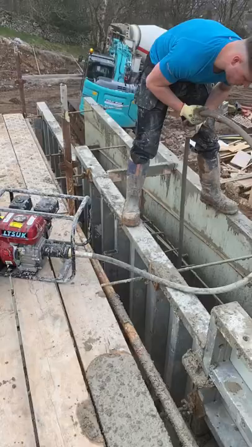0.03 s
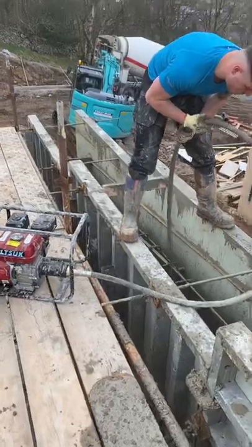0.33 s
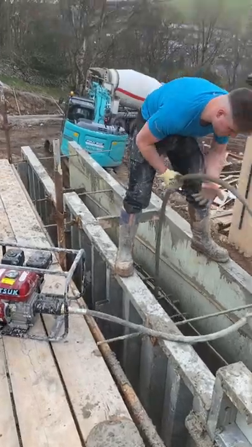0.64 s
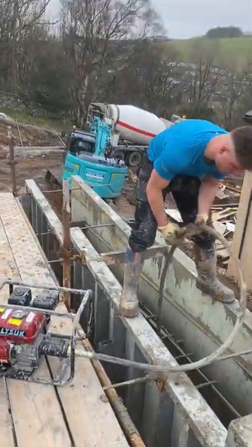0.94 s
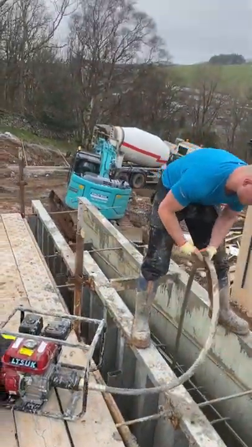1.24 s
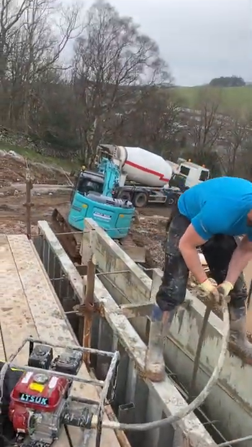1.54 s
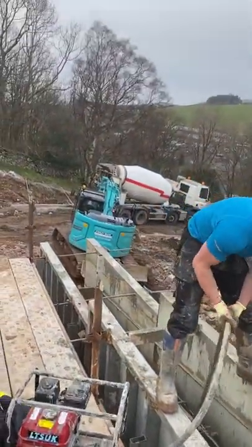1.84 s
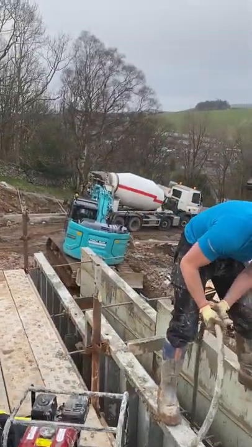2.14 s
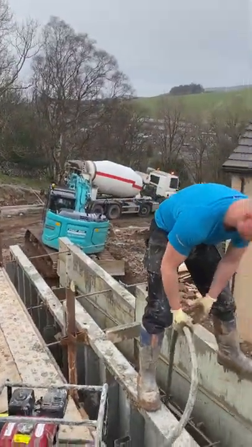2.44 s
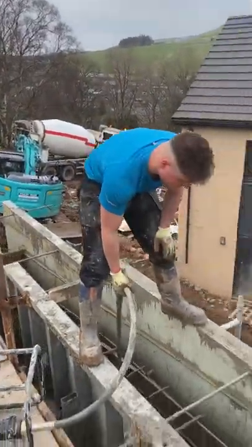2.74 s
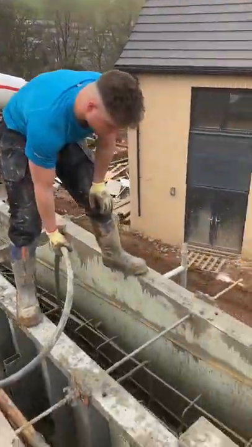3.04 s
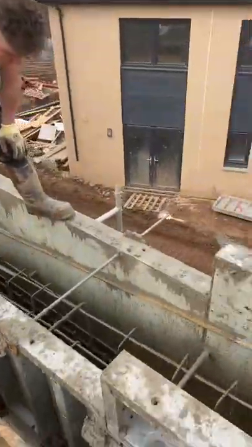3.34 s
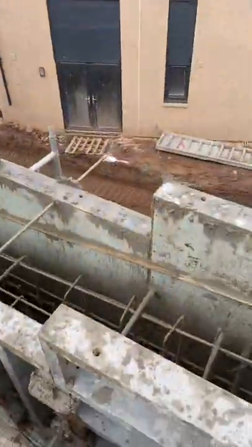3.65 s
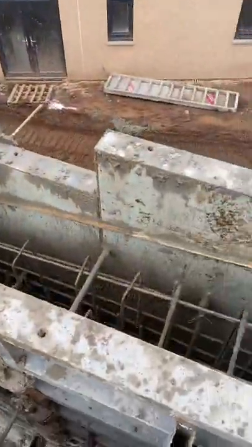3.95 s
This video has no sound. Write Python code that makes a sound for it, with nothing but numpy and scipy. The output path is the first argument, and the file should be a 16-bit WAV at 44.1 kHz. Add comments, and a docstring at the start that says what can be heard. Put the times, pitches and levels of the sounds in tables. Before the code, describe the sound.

Close petrol engine chugging steadily while a concrete vibrating poker drones and swells.

```python
"""On a building scaffold, a single-cylinder four-stroke petrol engine runs close by at governed speed.
Periodic puffs make its exhaust thud, impacts ring its casing, and its valve gear and fan clatter.
Through a flexible shaft it spins the eccentric weight of a vibrating poker, which drones and buzzes
against the concrete formwork as it is dipped and moved. The sound cuts out for an instant halfway."""
import sys
import numpy as np
from scipy import signal
from scipy.fft import rfft, irfft
from scipy.io import wavfile

SR = 44100
rng = np.random.default_rng(int(sys.argv[2]) if len(sys.argv) > 2 else 0)


def waveform_to_disk(signal):
    """Save audio, clipped to [-1, 1], as 16-bit WAV at the path in sys.argv[1]."""
    frames = np.transpose(np.atleast_2d(signal))
    scaled = np.clip(frames, -1, 1) * 32767
    samples = np.round(scaled).astype(np.int16)
    wavfile.write(sys.argv[1], SR, samples)


N = 176400
T = np.arange(N) / SR
HZ = np.fft.rfftfreq(N, 1 / SR)
RUMBLE_HZ, TREBLE_HZ, AIR_HZ = 686, 2650, 6360  # crossovers of the clatter bands
# impacts in each engine cycle (place [cycles], relative level [dB])
IMPACTS = [(.02, 0.5), (0.459, -8.5), (0.652, 0.5)]


def exhaust(cycles):
    """Harmonic series: one slightly uneven puff per firing, smeared by dispersion in the silencer."""
    # exhaust harmonics (order [multiple of firing rate], relative level [dB])
    harmonics = [(1, -51), (2, -37), (3, -41.5), (4, -32.5), (5, -27.5), (6, -28.5), (7, -39), (8, -34.5),
                 (9, -37.5), (12, -50), (13, -58.5), (14, -49.5), (16, -42), (18, -49)]
    # bass as the microphone moves round the exhaust (time [s], order 2 gain [dB], order 4 gain [dB])
    bass = [(0.05, 11.5, 3), (.2, 10.5, -1), (.45, 5.5, 2), (.6, 5, -3), (1.05, 5.5, -1), (1.4, 5.5, -1),
            (2, 4, 0), (2.6, 2.5, 1.5), (3.2, 3, 5), (3.8, -1.5, 2), (4, -2, 0.5)]
    thud_db, hum_db = curves(bass)
    swell_db = {2: thud_db, 4: hum_db}
    puffs = np.zeros(N)
    for k, db in harmonics:
        turns = k * (cycles + 0.0905) - 0.02168 * k ** 2  # high orders lag
        puffs += amp(db + swell_db.get(round(k), 0)) * np.cos(2 * np.pi * turns)
    return np.sqrt(2) * amp(-0.66) * puffs * (1 + 0.027 * wander(rate_hz=8.5))


def poker(cycles):
    """Rotating unbalance: the weight drones at its spin rate; contact with the formwork adds harmonics."""
    # drive ratio, slipping under load (time [s], ratio [turns per firing])
    gearing = [(.5, 7.7), (.65, 7.66), (1.0, 7.67), (1.25, 7.715), (1.7, 7.71), (1.9, 7.73), (2.5, 7.72),
               (2.85, 7.67), (3.3, 7.71), (4, 7.7)]
    # fundamental (time [s], level [dB])
    drone_level = [(0, -36), (.57, -35), (.62, -23), (.66, -22), (.71, -16), (.79, -17), (.86, -23),
                   (.93, -20), (1.0, -19), (1.11, -14.3), (1.17, -18), (1.23, -11.8), (1.34, -10.2),
                   (1.52, -11.7), (1.73, -15), (1.785, -23), (1.85, -12), (1.95, -17), (2.02, -22),
                   (2.17, -20), (2.35, -27), (2.56, -20), (2.72, -26), (2.92, -31), (3.15, -21.5),
                   (3.42, -19), (3.52, -24), (3.62, -20), (3.77, -16.5), (3.93, -19.5), (4, -24)]
    # contact buzz (time [s], second harmonic [dB], third harmonic [dB])
    buzz_level = [(0, -46, -60), (.54, -43, -58), (.58, -31.5, -48), (.65, -28.5, -37), (.7, -21.5, -21.5),
                  (.78, -20, -25.5), (.84, -23, -28), (.9, -16, -24.5), (.98, -19, -27), (1.08, -34, -44),
                  (1.2, -31.5, -36), (1.31, -34.5, -28.5), (1.52, -37.5, -42), (1.63, -22, -46),
                  (1.76, -33, -48), (2.2, -37.5, -35.5), (2.6, -37, -37), (2.82, -32, -46),
                  (3.1, -29.5, -41), (3.6, -39, -44), (3.95, -28, -51)]
    # upper buzz (harmonic [multiple of spin rate], level re third harmonic [dB])
    overtones = [(4, -9), (5, -13), (6, -9), (7, -14.5), (8, -15.5)]
    (drone_db,), (second_db, third_db) = curves(drone_level), curves(buzz_level)
    lag_turns = 0.1667
    turns = np.cumsum(curves(gearing)[0] * np.gradient(cycles)) + 0.012 * wander(rate_hz=15)
    drone = amp(drone_db) * np.cos(2 * np.pi * (turns - lag_turns)) * (1 + 0.04 * wander(rate_hz=7.2))
    contact = turns + 0.022 * wander(rate_hz=24)
    buzz = np.zeros(N)
    for k, db in [(2, second_db), (3, third_db)] + [(k, third_db + db) for k, db in overtones]:
        roughness = 1 + 0.17 * np.sqrt(k) * wander(rate_hz=15)
        buzz += amp(db) * np.cos(2 * np.pi * (k * contact - lag_turns * k ** 2)) * roughness
    return np.sqrt(2) * (drone + buzz)


def knocks(cycles):
    """Impact excitation: piston and valves strike the casing each cycle, and its damped modes ring."""
    # casing modes (frequency [Hz], relative level [dB], T60 [s])
    modes = [(384.3, -7.5, 0.078), (780, -0.5, 0.15), (869, -12.5, 0.08), (1019.5, 2.5, 0.082),
             (1200, -9, 0.048), (1415, -21, 0.0067), (1680, -8, 0.034), (1940, -7, 0.051),
             (2300, -14, 0.0072)]
    blows, t = np.zeros(N), np.arange(SR // 10) / SR
    for place, db in IMPACTS:
        times = np.interp(np.arange(int(cycles[-1])) + place, cycles, T)
        jitter, scatter_db = rng.standard_normal((2, 200))[:, :len(times)]
        at = np.clip(((times + 0.00005 * jitter) * SR).astype(int), 0, N - 1)
        blows[at] += amp(db - scatter_db)
    ring = sum(amp(db - 60 * t / t60) * np.cos(2 * np.pi * hz * t) * (-1) ** i
               for i, (hz, db, t60) in enumerate(modes))
    sound = signal.oaconvolve(blows, ring)[:N]
    return amp(-29) * unit(sound - sound.mean())


def whine(cycles):
    """Forced vibration: casing and frame pick out high engine orders, each wavering by itself."""
    # casing tones (order [multiple of firing rate], level [dB])
    orders = [(10, -44.5), (11, -42), (22, -37), (23, -45.5), (25, -39.5), (26, -39.5), (27, -47),
              (28, -42), (29, -36.5), (30, -33.5), (31, -46.5), (32, -52), (34, -39), (35, -42)]
    tones = np.zeros(N)
    for k, db in orders:
        angle = 2 * np.pi * (k * cycles - 0.00403 * k ** 2)
        tones += amp(db) * (np.sin(angle) + 0.4 * wander(rate_hz=2.85) * np.cos(angle))
    return np.sqrt(2) * tones


def clatter(cycles, ripple_db):
    """Amplitude-modulated noise: fan rush and loose ticks surge with each cycle and after each knock."""
    # noise spectrum (frequency [Hz], relative density [dB])
    colour = [(25, -20), (42, 4.5), (55, -3), (120, -2.5), (230, 2), (400, -2), (520, 2.5), (660, -6.5),
              (900, -1.5), (1300, -1), (1650, -4.5), (2400, -6.5), (2950, -11.5), (3350, -12.5),
              (4400, -12.5), (5100, -11), (6200, -12.5), (9500, -7), (12000, -10), (16000, -15)]
    # band gains as the microphone moves round the engine (time [s], middle [dB], treble [dB], top [dB])
    band_gains = [(0.05, -17.5, -21, -28), (0.13, -20, -23, -29), (0.22, -23, -24.5, -31),
                  (0.5, -23.5, -25.5, -32.5), (0.8, -22, -25.5, -33), (1.0, -22.5, -26.5, -31.5),
                  (1.15, -25, -29.5, -33.5), (1.7, -27, -32, -36), (2.3, -27, -31, -36),
                  (2.6, -27.5, -29.5, -35.5), (2.85, -25, -30.5, -36), (3.15, -24.5, -31.5, -34.5),
                  (3.45, -26.5, -34, -35), (3.95, -25.5, -33, -33)]
    ticks_per_s, burst_cycles = 590, 0.12
    ticks = rng.standard_normal(N) * (rng.random(N) < ticks_per_s / SR)
    ticks *= amp(1.5 * np.minimum(rng.exponential(1, N), 4))
    bursts = sum(amp(db) * np.exp(-((cycles - place) % 1) / burst_cycles) for place, db in IMPACTS)
    surge = amp(0.54 * np.cos(2 * np.pi * (cycles - 0.86)) + 2.5 * bursts)
    noise = (rng.standard_normal(N) + amp(-10) * unit(ticks)) * surge
    hz, db = np.transpose(colour)
    spectrum = rfft(noise) * amp(np.interp(np.log(HZ + 1), np.log(hz), db) + ripple_db)
    low, mid, high = (1 / (1 + (HZ / edge) ** 12) for edge in (RUMBLE_HZ, TREBLE_HZ, AIR_HZ))
    middle_db, treble_db, top_db = curves(band_gains)
    bands = [(low, 0.57 * middle_db - 17), (mid - low, middle_db - 4),
             (high - mid, treble_db - 4), (1 - high, top_db - 3)]
    return panels(sum(amp(db) * unit(irfft(spectrum * band, N)) for band, db in bands))


def panels(sound):
    """Resonance and directivity: each cover panel adds its ring while it faces the microphone."""
    # panel resonances (frequency [Hz], bandwidth [Hz], peak gain [dB], peak time [s], half length [s])
    resonances = [(340, 85, 7, 0.26, 0.63), (384, 18, 5.5, 3.46, 1), (1030, 30, 6.5, 0.89, 0.11),
                  (1185, 30, 6.5, 1.24, 0.57), (1360, 79, 5.5, 0.81, 0.79), (2140, 940, 5.5, 0.27, 0.43),
                  (1300, 140, 5, 3.88, 0.22), (1630, 33, 7.5, 2.64, 0.26), (1930, 120, 4, 2.92, 0.3),
                  (2288, 52, 11, 2.01, 0.99), (2690, 165, 8.5, 3.58, 0.51), (3140, 230, 8.5, 3.77, 0.52),
                  (3710, 250, 8.5, 3.58, 0.54), (4130, 200, 6.5, 3.2, 0.65), (5100, 150, 5.5, 3.04, 0.29)]
    spectrum, rings = rfft(sound), np.zeros(N)
    for hz, width, db, centre, half in resonances:
        facing = np.exp(-((T - centre) / half) ** 2)
        rings += (amp(db) - 1) * facing * irfft(spectrum / (1 + 2j * (HZ - hz) / width), N)
    return sound + rings


def amp(db):
    """Decibels to amplitude ratio."""
    return 10 ** (np.asarray(db) / 20)


def unit(x):
    """Normalisation to rms 1."""
    return x / np.sqrt(np.mean(x ** 2) + 1e-20)


def curves(table, at=T):
    """Linear interpolation of each later column against the first."""
    first, *columns = np.transpose(table)
    return [np.interp(at, first, c) for c in columns]


def wander(rate_hz):
    """Low-pass noise: slow random motion of rms 1."""
    return unit(irfft(rfft(rng.standard_normal(N)) / (1 + (HZ / rate_hz) ** 4), N))


def scene():
    """Superposition at two microphones: clatter scattered from the site lowers their coherence."""
    # governed speed (time [s], firing rate [Hz])
    speed = [(0, 34.6), (0.25, 35.2), (0.5, 34.77), (0.75, 34.52), (0.95, 34.29), (1.15, 34.52),
             (1.35, 34.99), (1.65, 34.51), (2.0, 34.9), (2.55, 34.67), (2.8, 34.37), (3.05, 34.65),
             (3.3, 34.5), (3.6, 34.59), (4.0, 34.86)]
    # stereo pair (frequency [Hz], left phase lead [rad], left minus right [dB], clatter coherence [0-1])
    pair = [(60, 0, 0, 1), (140, -.05, -.4, 1), (270, -.13, -1.4, .998), (400, -.25, -2, .96),
            (540, -.48, -2.8, .94), (800, -.08, -2, .96), (1050, 0, -1.1, .985), (1400, 0, -.2, .998),
            (2300, 0, -.1, .98), (2950, .7, -2.5, .62), (3400, .8, -2.5, .72), (4200, .9, -3, .83),
            (5000, .15, 0, .88), (6000, 1.6, 0, .8), (7000, 3.05, 0, .99), (7800, 3.25, 0, .99),
            (8700, 4.6, 0, .78), (9900, 6.28, 0, .99), (11200, 6.3, 0, .98), (12000, 8, 0, .75),
            (12900, 9.35, 0, .99), (14200, 9.5, 0, .99), (15400, 12.2, 0, .7)]
    cycles = np.cumsum(curves(speed)[0]) / SR
    lead, balance_db, coherence = curves(pair, HZ)
    coherence = np.clip(coherence, 0, 1)
    # reflections off the boards ripple the clatter spectrum at a spacing of 45 Hz
    ripple = np.interp(HZ / 45, np.arange(N), rng.standard_normal(N))
    ripple_db = 1.4 * ripple * np.minimum(HZ / TREBLE_HZ, 1)
    machine = exhaust(cycles) + panels(knocks(cycles) + whine(cycles)) + poker(cycles)
    direct = rfft(machine) + np.sqrt((1 + coherence) / 2) * rfft(clatter(cycles, ripple_db))
    scattered = np.sqrt((1 - coherence) / 2) * rfft(clatter(cycles, ripple_db))
    pan = amp(balance_db / 2) * np.exp(1j * lead / 2)
    return np.array([irfft((direct + scattered) * pan, N), irfft((direct - scattered) / pan, N)])


def record(dry):
    """Gating, saturation and band limiting: an abrupt start, one brief gap and rounded peaks."""
    start_s, gap_from_s, gap_to_s = 0.036, 2.1065, 2.134
    ceiling, cutoff_hz = 0.85, 15800
    gate = (T > start_s) & ((T < gap_from_s) | (T > gap_to_s))
    rounded = gate * dry / (1 + (dry / ceiling) ** 8) ** (1 / 8)
    lowpass = signal.firwin(511, cutoff_hz, window=("kaiser", 9), fs=SR)
    return signal.oaconvolve(rounded, lowpass[None], "same")


dry = scene()
out = record(dry)
waveform_to_disk(out)
```